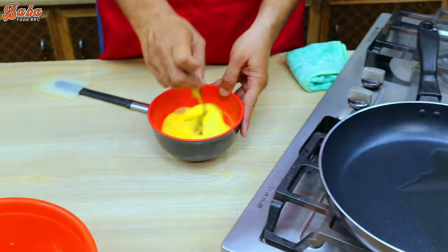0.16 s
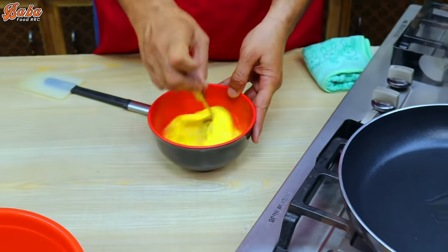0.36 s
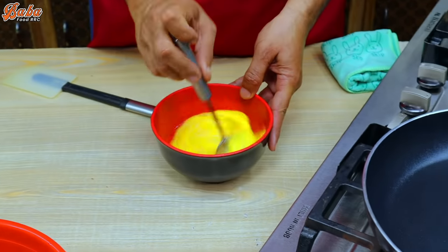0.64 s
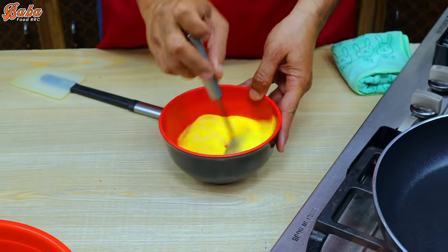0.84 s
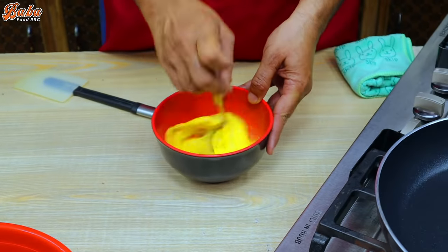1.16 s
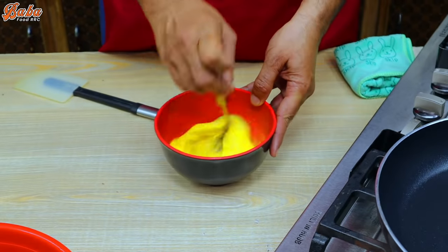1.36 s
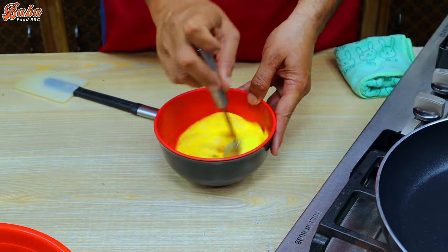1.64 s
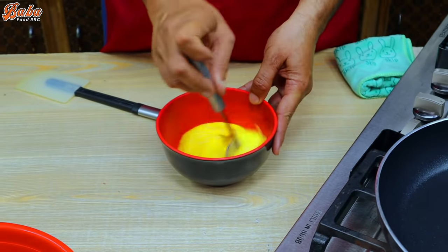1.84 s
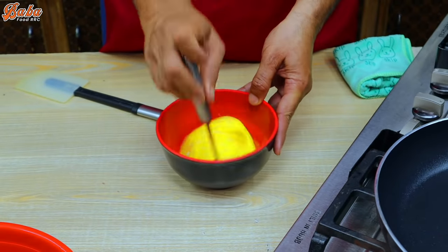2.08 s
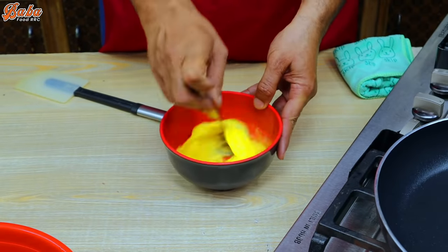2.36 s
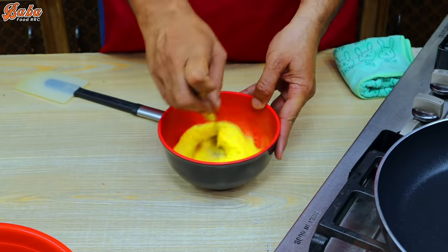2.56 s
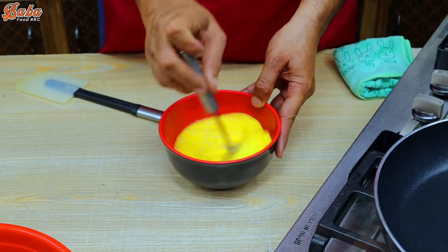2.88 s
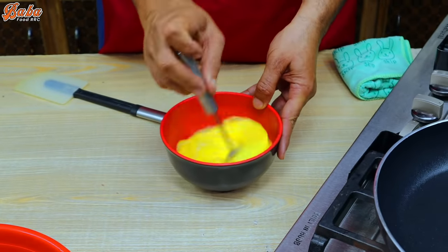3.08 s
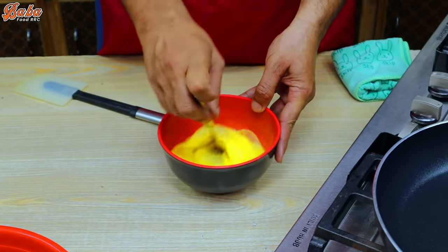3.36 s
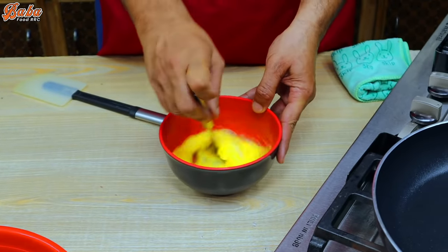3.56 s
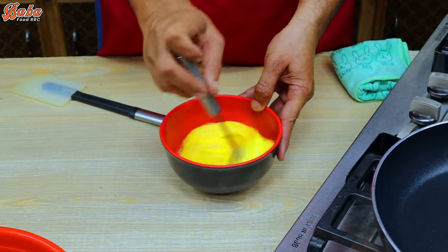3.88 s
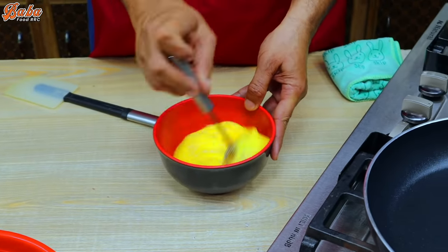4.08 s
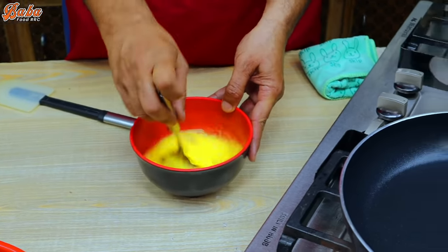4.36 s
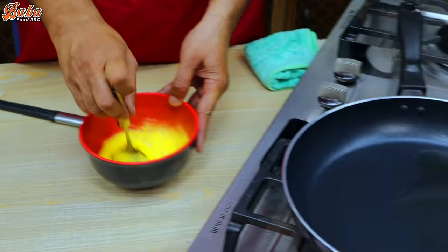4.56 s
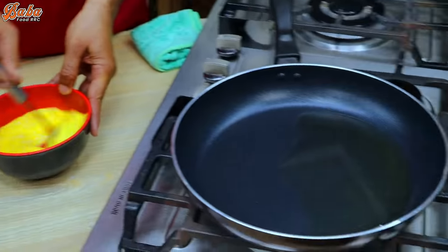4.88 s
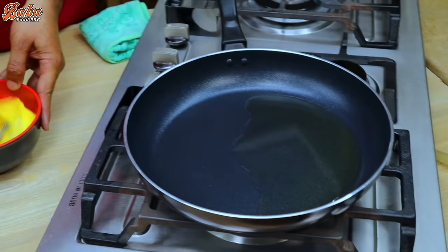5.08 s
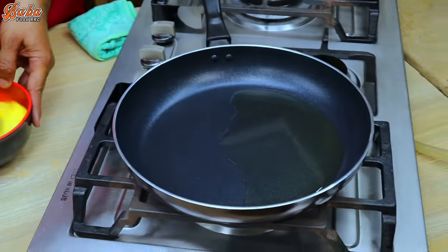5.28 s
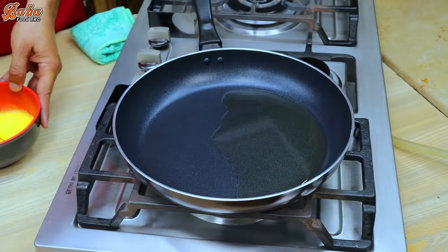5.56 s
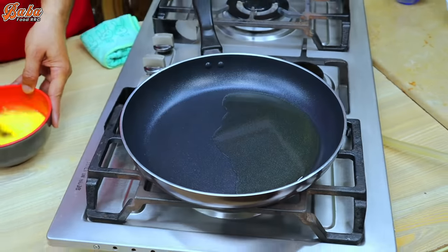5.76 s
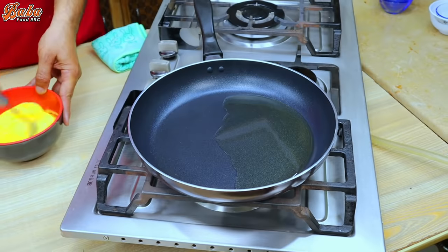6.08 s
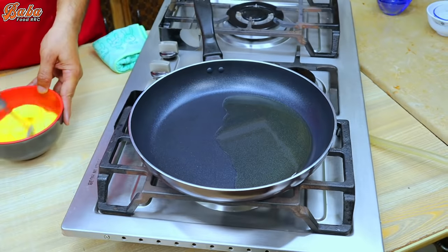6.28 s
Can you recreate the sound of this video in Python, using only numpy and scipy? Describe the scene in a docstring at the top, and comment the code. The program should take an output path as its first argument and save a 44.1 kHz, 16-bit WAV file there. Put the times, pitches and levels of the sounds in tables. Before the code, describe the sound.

Eggs are beaten with a metal utensil in a small hand-held plastic bowl, at a steady five strokes a second throughout. Each stroke brings a wet squelch, a hollow knock on the bowl with a low thump beneath, and a little plop, then the egg slops and swishes round. The sound is close, with the short reverberation of a small hard kitchen and a faint background hum and hiss.

```python
"""Eggs are beaten with a metal utensil in a small hand-held plastic bowl, five strokes a second.
Over a faint kitchen background, each stroke draws a falling squelch as the metal plunges into the egg.
The metal knocks on the bowl, a low thump booms beneath it and a trapped pocket of air plops.
The egg then slops against the wall, splats back and swishes round until the next stroke.
The worktop reflects each knock, and the small hard kitchen reverberates after every sound."""
import sys
import numpy as np
from scipy import signal
from scipy.fft import rfft, irfft
from scipy.io import wavfile
from scipy.ndimage import uniform_filter1d, map_coordinates

SR = 44100
rng = np.random.default_rng(int(sys.argv[2]) if len(sys.argv) > 2 else 0)


def output_pcm(signal):
    """Save a mono or channel-first signal as 16-bit PCM at the path in sys.argv[1].

    Samples are clipped to [-1, 1] before scaling.
    """
    pcm = np.clip(np.atleast_2d(signal).T, -1, 1) * 32767
    wavfile.write(sys.argv[1], SR, np.round(pcm).astype(np.int16))


N = 283122
SIZE = 16384  # samples in one event
AGE = np.arange(SIZE) / SR  # seconds since the event began

# The strokes, with relative levels. Each row: time of the blow in seconds, force in dB,
# thud of the bowl's base in dB, air pocket pitch in Hz, air pocket level in dB.
STROKES = [(0.0132, 1.5, 4.5, 1435, 4.5), (0.2181, 4, 4, 1292, 2), (0.4217, -2.5, -0.5, 1060, -4),
           (0.6189, 0.5, 5, 1653, 7.5), (0.8211, -3.5, -0.5, 1710, 8.5), (1.023, 3.5, -.5, 1910, 6),
           (1.2219, 0.5, 4.5, 898, 8.5), (1.4226, -1, -7, 1006, 7.5), (1.6259, 2.5, 1.5, 920, -14),
           (1.8272, 0, 4.5, 1228, 4), (2.0329, -2, -3.5, 1616, 3.5), (2.2342, 5, 5, 1487, 11.5),
           (2.447, -1, 4, 940, -6), (2.6511, 0, 3, 1534, 4), (2.8564, 2, -2.5, 1790, 8),
           (3.0634, 1.5, -2.5, 803, -12), (3.2627, -1, -3, 2525, -1), (3.4589, 1, -5, 1705, 2.5),
           (3.6618, -1.5, -2, 894, -6), (3.8587, 0, 3.5, 1010, 9.5), (4.065, 3.5, -0.5, 2300, 2),
           (4.2714, -.5, -1.5, 829, 6), (4.4725, 4.5, -5.5, 1556, 7.5), (4.6721, 5, -4.5, 1429, 10.5),
           (4.8664, 4.5, -3.5, 2330, -6), (5.0674, 2, -5.5, 1084, 7.5), (5.2685, -2, -3.5, 2290, 3),
           (5.4639, -1.5, -2, 2018, 7.5), (5.6673, -.5, -0.5, 690.4, 3.5), (5.863, 2, -3.5, 2090, 6.5),
           (6.062, -3, 2, 705, -7), (6.2633, -3.5, -1, 650, -6)]
# The low, middle and high range of a blow. Each holds: level in a usual stroke in dB,
# dB per dB of force, dB per octave of pocket pitch.
KNOCK_LAW = (-4.5, 2.02, -7.5)
CLACK_LAW = (0.26, 1.37, 0.63)
TICK_LAW = (2.04, 0.85, 0)
# The egg's wet hiss. Each row: time in seconds, level against the usual in dB.
HISS_LEVEL = [(0.0, -1), (0.7, -0.5), (1.25, -0.3), (1.9, 1), (2.3, 0), (2.7, 2), (2.9, -0.2), (3.3, 1.7),
              (3.9, 2.1), (4.4, 1.1), (4.8, 0.5), (5.15, -2), (5.7, -0.5), (6.3, 3)]
# How hard the metal plunges. Each row: time in seconds, relative level in dB.
PLUNGE_LEVEL = [(.3, -6), (.65, -4), (1.85, -7.5), (2.25, -2.5), (3.5, -3.5), (4.3, 0.5), (4.85, -2.5),
                (5.15, -7.5), (6.3, -5)]
# The treble of the blows. Each row: time in seconds, gain in dB.
TREBLE_GAIN = [(.6, -5), (1.4, -0.5), (3.5, -1.5), (5.3, -4.5), (5.75, -6.5), (6.2, 0.5)]
# The reflection off the worktop. Each row: time in seconds, lag in seconds.
REFLECTION_LAG = [(.4, 0.00013), (1.2, 0.00038), (3.5, 0.0004), (4.3, .00041), (5.05, 0.00024)]
# Light touches of metal on the wall. Each row: start in seconds, gain in dB.
GRAZES = [(1.915, -11), (2.074, -18), (3.637, -2), (3.644, -21), (3.819, -19), (4.046, -21), (4.360, -13.5),
          (6.301, -20)]
# Slurps of egg between blows. Each row: time of the peak in seconds, level in dB.
SLURPS = [(1.105, -43), (1.32, -29), (1.927, -31.5), (1.968, -30.5), (2.182, -28), (2.779, -31)]
# Modes of the loaded bowl and of the low thump. Each row: frequency in Hz, relative level in dB,
# time to decay by 60 dB in seconds.
BOWL_MODES = [(203.4, -14.5, 0.12), (315.1, -19.5, 0.31), (381, -2, 0.033), (381, -14.5, 0.23),
              (501, -12.5, 0.24), (496, -10, 0.056), (587, 4.5, 0.023), (659, -3.5, 0.055), (756, -3, 0.12),
              (816, -9.5, 0.16), (952, -9, 0.18), (984, 4.5, 0.031), (1155, -9.5, 0.067), (1450, -6, 0.037),
              (1722, 0, 0.021), (2280, -66, 0.015), (2176, -27, 0.064), (2923, -14.5, 0.11),
              (3150, -44, 0.1), (3688, -1.5, 0.025), (4800, -15, 0.1), (7900, -40, 0.028),
              (12280, -4.5, 0.0095)]
LOW_THUMP_MODES = [(47, -3, 0.24), (61, -4, 0.11), (74, -2.5, 0.32), (87.4, 13, 0.054), (119.7, -3.5, 0.32)]
# Spectra of the noises. Each row: frequency in Hz, gain in dB.
BACKGROUND_SPECTRUM = [(20, -23), (55, -7), (110, -16), (150, -4), (210, 6), (290, 3.5), (600, -20.5),
                       (2000, -12.5), (6000, 0), (16000, -48)]
FILM_SPECTRUM = [(60, -31), (150, -13.5), (300, -3.5), (900, 2), (2000, -2.5), (5000, 1), (8300, -1.5),
                 (10500, -10), (13000, -10), (16000, -19)]
SWISH_SPECTRUM = [(60, -45), (150, -34), (290, -2), (900, 1.5), (2000, 0.5), (3000, -0.5), (3900, -8),
                  (5000, 14), (5600, -6), (6400, 6.5), (8400, 5), (10500, -6), (13000, -4.5), (16000, -17)]
CONTACT_SPECTRUM = [(60, -37), (150, -13.5), (300, 5), (700, 2.5), (1700, -1), (3300, 0), (6000, -1.5),
                    (7300, -8), (8400, -0.5), (9800, -15.5), (12700, -17), (16000, -22)]
RUMBLE_SPECTRUM = [(15, -30), (40, 7), (70, 6), (115, -6), (145, -18), (200, -5), (400, -29), (1500, -60),
                   (16000, -90)]
# Reverberation of the kitchen. Each row: frequency in Hz, time to decay by 60 dB in seconds.
ROOM_T60 = [(100, 1), (300, 0.28), (1000, 0.39), (3000, 0.27), (8000, 0.21), (16000, 0.24)]


def undb(db):
    """Amplitude grows tenfold for every 20 dB."""
    return 10 ** (np.asarray(db) / 20)


def add(track, s, sound):
    """Superposition: a sound starting at s seconds adds to the track."""
    start = int(round(s * SR))
    lo, hi = max(start, 0), min(start + len(sound), N)
    if hi > lo:
        track[lo:hi] += sound[lo - start:hi - start]


def at_time(points, s):
    """Linear interpolation reads (seconds, value) points at time s."""
    return np.interp(s, *np.transpose(points))


def at_hz(points, hz):
    """Interpolation reads (Hz, value) points on a logarithmic frequency axis."""
    f, value = np.transpose(points)
    return np.interp(np.log(hz + 1), np.log(f), value)


def colour(x, points, size=4096):
    """A minimum-phase filter through (Hz, dB) points shapes the spectrum causally."""
    cepstrum = irfft(np.log(undb(at_hz(points, np.fft.rfftfreq(size, 1 / SR)))))
    cepstrum[1:size // 2] *= 2
    cepstrum[size // 2 + 1:] = 0
    return signal.fftconvolve(x, irfft(np.exp(rfft(cepstrum))))[:len(x)]


def level(x, db):
    """Normalisation brings the rms amplitude to the given level."""
    return x * undb(db) / np.sqrt(np.mean(x ** 2) + 1e-18)


def fade(t60):
    """Exponential decay falls from 1 by 60 dB in t60 seconds."""
    return np.exp(-np.log(1000) * AGE / t60)


def swell(centre_s, width_s):
    """A Gaussian envelope rises and falls smoothly."""
    return np.exp(-.5 * ((AGE - centre_s) / width_s) ** 2)


def ring(hz, t60, glide=0):
    """A damped oscillator rings; its pitch climbs by the fraction glide as it dies."""
    pitch = hz * (1 + glide * (1 - fade(2 * t60)))
    return fade(t60) * np.sin(2 * np.pi * np.cumsum(pitch) / SR)


def crackle(per_s, spread_db):
    """Shot noise over the whole scene: random impulses, a few much larger than the rest; rms 1."""
    sizes = undb(spread_db * np.minimum(rng.exponential(size=N), 4))
    return level((rng.random(N) < per_s / SR) * sizes * rng.choice([-1, 1], N), 0)


def hollow(hz, width_hz):
    """Narrow-band noise stands for a resonance whose centre may move; rms 1."""
    lowpass = signal.butter(2, width_hz / 2, fs=SR, output="sos")
    wobble = signal.sosfilt(lowpass, rng.standard_normal((2, 2 * SIZE)))[:, SIZE:]
    phase = 2 * np.pi * np.cumsum(hz * np.ones(SIZE)) / SR
    return level(wobble[0] * np.cos(phase) + wobble[1] * np.sin(phase), 0)


def background():
    """Stationary coloured noise fills the kitchen faintly."""
    return level(colour(rng.standard_normal(N), BACKGROUND_SPECTRUM), -43.5)


def furrow(lead_s=.075, start_hz=7000, octaves_per_s=25):
    """Cavity resonance: the furrow behind the metal deepens, so its squelch falls towards the blow."""
    out = np.zeros(N)
    hz = start_hz * 2 ** (-octaves_per_s * AGE)
    for s, *_ in STROKES:
        detune, loudness = rng.standard_normal(2)
        squelch = hollow(hz * np.exp(0.089 * detune), 730) * swell(0.058, 0.031)
        add(out, s - lead_s, undb(at_time(HISS_LEVEL, s) + 2 * loudness - 43.5) * squelch)
    return out


def egg(plunge_s=0.0096, splat_s=0.036, swish_s=0.126, loosen_db_per_s=1.9, flutter_db=1.0):
    """Tearing films make shot noise as the metal plunges and flung egg lands; then the egg swishes."""
    tearing, swish = np.zeros(N), np.zeros(N)
    lags_s = rng.standard_normal((len(STROKES), 3)) * [.002, .005, .006]  # the hand is never regular
    for (s, *_), (entry_lag, splat_lag, swish_lag) in zip(STROKES, lags_s):
        plunge_db = at_time(PLUNGE_LEVEL, s)
        splat_db = at_time(HISS_LEVEL, s)
        swish_db = 1.85 * at_time(HISS_LEVEL, s + swish_s)
        # the metal breaks the surface, then speeds up through the egg until it meets the wall
        add(tearing, s - .024 + entry_lag, undb(plunge_db + .5 * swish_db - 27) * swell(0.0059, 0.003))
        add(tearing, s - 3 * plunge_s, undb(plunge_db - 21.5) * swell(3 * plunge_s, plunge_s))
        # the late part of the splat fades as the egg is beaten thin
        cling = undb(-5.5 - loosen_db_per_s * s) * swell(0.076, 0.027)
        add(tearing, s + splat_lag, undb(splat_db - 26.5) * (swell(splat_s, 0.011) + cling))
        add(swish, s + swish_s + swish_lag, undb(swish_db + 5) * fade(0.48) * (1 - fade(0.14)))
    # egg tears in clots, so its hiss comes unevenly
    slow_noise = uniform_filter1d(uniform_filter1d(rng.standard_normal(N), size=400), size=200)
    clots = undb(flutter_db * level(slow_noise, 0))
    films = level(colour(crackle(4500, 0.99), FILM_SPECTRUM), 0)
    drag = level(colour(crackle(5000, 3.1), SWISH_SPECTRUM), -38)
    return clots * (tearing * films + (swish + 0.27) * (drag + froth()))


def froth(count=1400, loss_db_per_cycle=0.48):
    """Bubble resonance: small bubbles in the foam ring for a few dozen cycles each."""
    out = np.zeros(N)
    for when, pitch, strength in rng.random((count, 3)):
        hz = 2600 * 3 ** pitch
        cycles = hz * AGE[:SIZE // 16]
        envelope = undb(17 * strength - loss_db_per_cycle * cycles)
        add(out, when * N / SR, envelope * np.sin(2 * np.pi * cycles))
    return level(out, -44)


def low_thumps():
    """Damped resonance: each blow sets off a low, booming thump; once there is a soft low rumble."""
    out = np.zeros(N)
    thump = sum((-1) ** k * undb(db) * ring(hz, t60) for k, (hz, db, t60) in enumerate(LOW_THUMP_MODES))
    for s, force_db, thud_db, *_ in STROKES:
        add(out, s - .002, undb(0.29 * thud_db + 0.051 * force_db - 38.5) * thump)
    envelope = np.interp(np.arange(N) / SR, [2.05, 2.1, 2.25], [0, 1, 0])
    rumble = level(colour(rng.standard_normal(N), RUMBLE_SPECTRUM), -36)
    return out + envelope * rumble


def knock(scatter_db=1.0, detune=0.0035):
    """Impact excites the bowl's modes, weighted by where the metal lands; it cracks, then skids."""
    body = np.zeros(SIZE)
    for k, (hz, db, t60) in enumerate(BOWL_MODES):
        weight, shift = rng.standard_normal(2)
        body += (-1) ** k * undb(db + scatter_db * weight) * ring(hz * (1 + detune * shift), t60)
    envelope = (fade(0.0071) + undb(-15.5) * fade(0.074)) * (1 - fade(0.0023))
    crack = colour(rng.standard_normal(SIZE) * envelope, CONTACT_SPECTRUM)
    friction = crackle(1500, 4.7)[:SIZE] * swell(0.0019, 0.014)
    skid = colour(friction, [(60, -38), (170, -25), (330, -2.5), (1000, 8.5), (2000, -19), (6000, -20)])
    return undb(-15) * body + level(crack, -30.5) + level(skid, -34.5)


def blow_spectrum(s, force_db, thud_db, pocket_hz, usual_pocket_hz=1200):
    """Excitation sets timbre: a deep stroke traps a low pocket and knocks dully, a shallow one clacks."""
    shallowness = np.log2(pocket_hz / usual_pocket_hz)
    low, mid, high = [db + per_force * force_db + per_octave * shallowness
                      for db, per_force, per_octave in (KNOCK_LAW, CLACK_LAW, TICK_LAW)]
    high += at_time(TREBLE_GAIN, s)
    return [(140, thud_db - 11), (230, thud_db - 1), (370, thud_db - 1.2),
            (560, (thud_db + low) / 2 + 0.23), (760, low), (950, low), (1250, (low + mid) / 2 + 5.5),
            (1600, mid), (3000, mid - .7), (5500, high - 2), (12000, high + 1.5)]


def pocket(hz, plop_cycles=21, gurgle_cycles=135):
    """Trapped air resonates in a damped plop and gurgles as it breaks up; big pockets last longer."""
    plop = ring(hz, plop_cycles / hz, glide=0.008) * (1 - fade(0.0037))
    gurgle = hollow(hz, 0.26 * hz) * fade(gurgle_cycles / hz) * (1 - fade(0.0015))
    return 1.22 * plop + level(gurgle, -24)


def beating():
    """Each stroke excites two resonators: the bowl it strikes and the air pocket it squeezes."""
    out = np.zeros(N)
    for s, force_db, thud_db, pocket_hz, pocket_db in STROKES:
        add(out, s, colour(knock(), blow_spectrum(s, force_db, thud_db, pocket_hz)))
        add(out, s, undb(pocket_db - 14) * pocket(pocket_hz))
    return out


def worktop_reflection(x, gain_db=-9):
    """Comb filtering: the worktop mirrors the bowl, with a lag that shifts as the listener moves."""
    t = np.arange(N) / SR
    lag_s = at_time(REFLECTION_LAG, t)
    return x + undb(gain_db) * map_coordinates(x, [(t - lag_s) * SR])


def slosh():
    """Egg slops on the wall in two broad resonances after each blow, fullest when the bowl thuds."""
    out = np.zeros(N)
    for s, _, thud_db, *_ in STROKES:
        resonances = hollow(360.7, 197) + 0.95 * hollow(589.3, 280)
        slop = resonances * fade(0.16) * (1 - fade(0.051))
        add(out, s + 0.00399, level(slop, thud_db - 41))
    return out


def room(x, wet_db=-9.5):
    """Reverberation: a diffuse tail follows the direct sound, and its treble dies soonest."""
    hz = np.fft.rfftfreq(SIZE, 1 / SR)
    octaves_hz = 125 * 2. ** np.arange(8)
    noise = np.exp(2j * np.pi * rng.random(len(hz)))
    tail = np.zeros(SIZE)
    for centre, weights in zip(octaves_hz, np.eye(len(octaves_hz))):
        band = irfft(noise * at_hz(list(zip(octaves_hz, weights)), hz))
        tail += band * fade(at_hz(ROOM_T60, centre))
    tail *= np.clip((AGE - .004) / 0.0081, 0, 1)
    tail /= np.sqrt(np.sum(tail ** 2))
    tone = [(100, -4.5), (210, 3), (300, 4.5), (600, 0), (900, 0), (3000, -.5), (10000, -2)]
    response = undb(wet_db) * colour(tail, tone)
    response[0] += 1  # the direct sound
    return signal.fftconvolve(x, response)[:N]


def slurps(hz=6030, width_s=0.00485):
    """The egg slurps now and then between blows, in short bursts of band-limited shot noise."""
    out = np.zeros(N)
    band = [(hz / 3, -18), (hz / 1.9, -10), (hz, 0), (hz * 1.37, -8), (hz * 2, -24)]
    for s, db in SLURPS:
        burst = level(colour(crackle(3000, 0.77)[:SIZE], band), db)
        add(out, s - 4 * width_s, burst * swell(4 * width_s, width_s))
    return out


def grazes():
    """Light impacts on the wall excite the bowl's modes, mostly in the middle range."""
    out = np.zeros(N)
    for s, db in GRAZES:
        add(out, s, undb(db) * colour(knock(), [(300, -13), (1200, 0), (8000, -22)]))
    return out


def scene():
    """Egg, thumps and bowl superpose and reverberate in the kitchen, over the steady background."""
    blows = worktop_reflection(beating() + grazes())
    sources = furrow() + egg() + low_thumps() + blows + slosh() + slurps()
    return (background() + room(sources))[None]


def record(dry, bottom_hz=36, top_hz=15900):
    """A high-pass drops the deepest bass, saturation rounds the peaks and a low-pass cuts the top."""
    lean = signal.sosfilt(signal.butter(5, bottom_hz, "high", fs=SR, output="sos"), dry)
    rounded = np.tanh(lean)
    return signal.sosfilt(signal.ellip(10, .2, 70, top_hz, fs=SR, output="sos"), rounded)


dry = scene()
out = record(dry)
output_pcm(out)
```